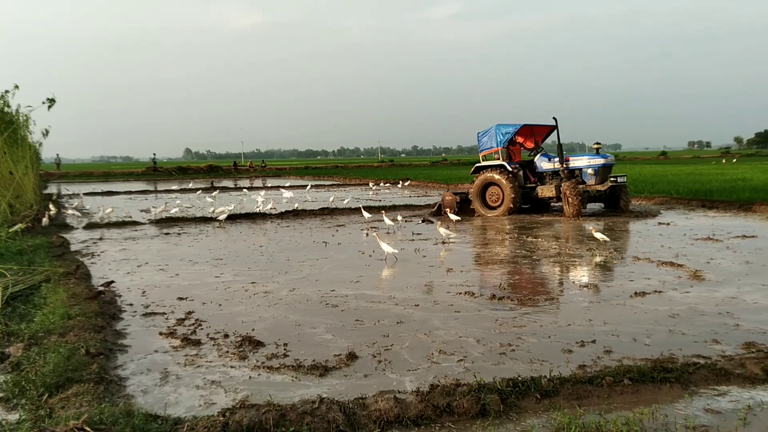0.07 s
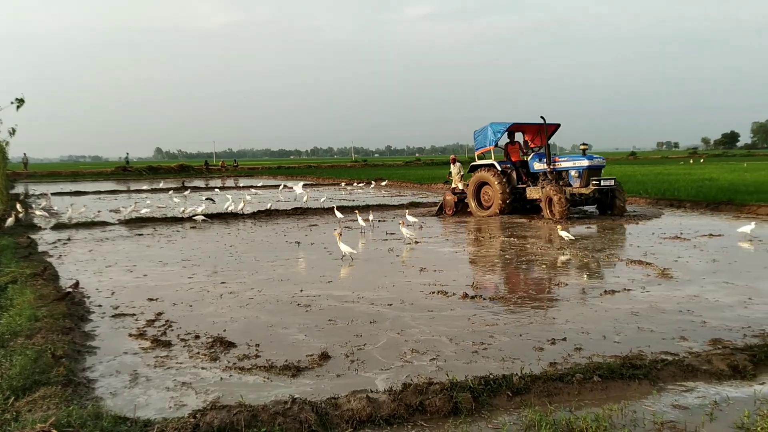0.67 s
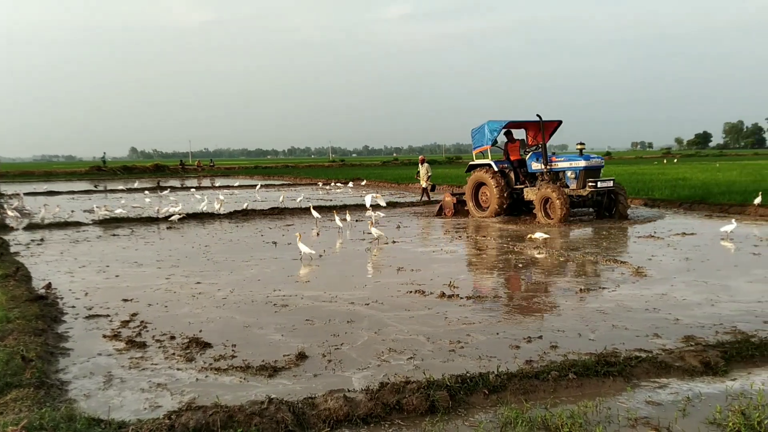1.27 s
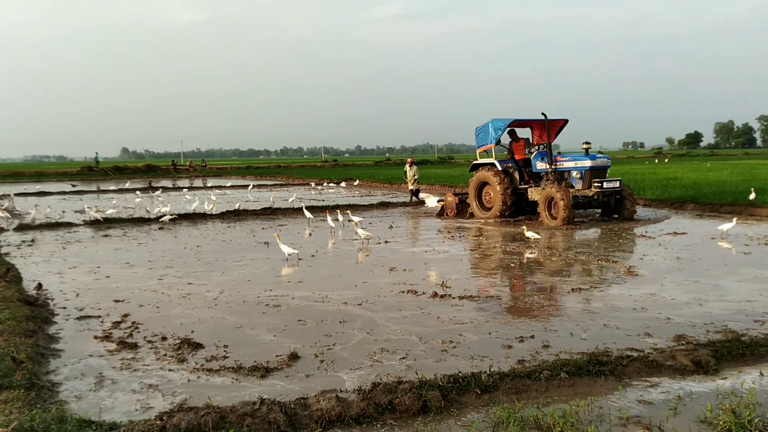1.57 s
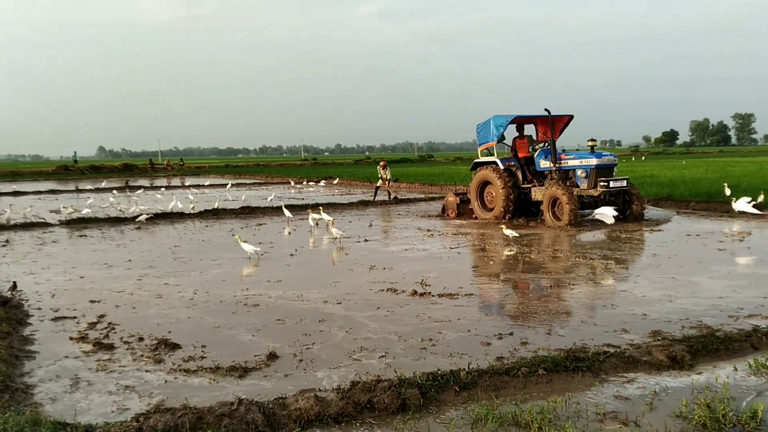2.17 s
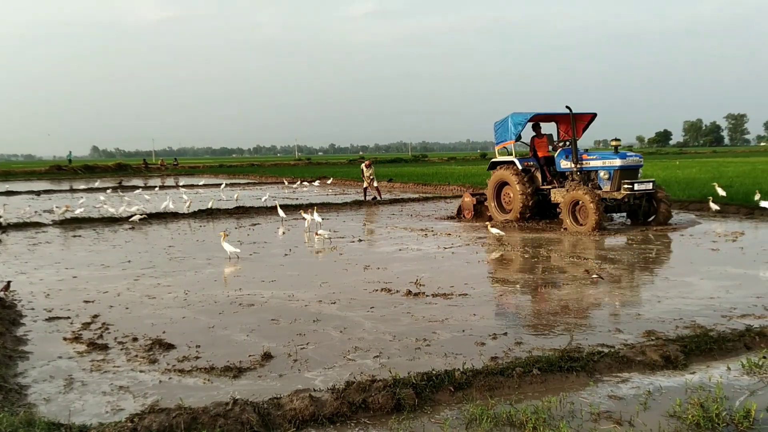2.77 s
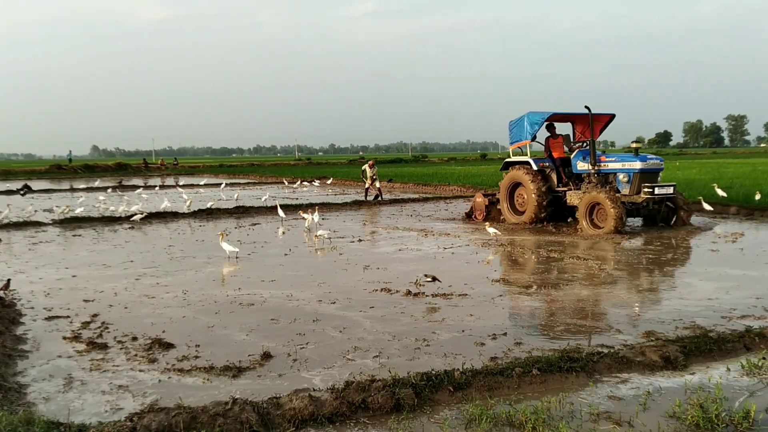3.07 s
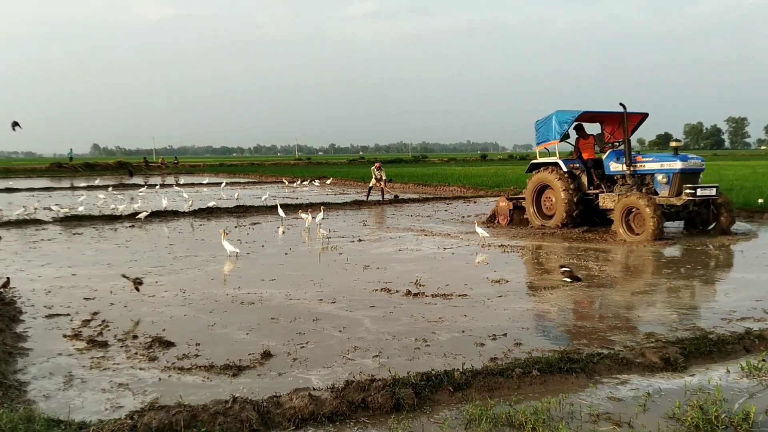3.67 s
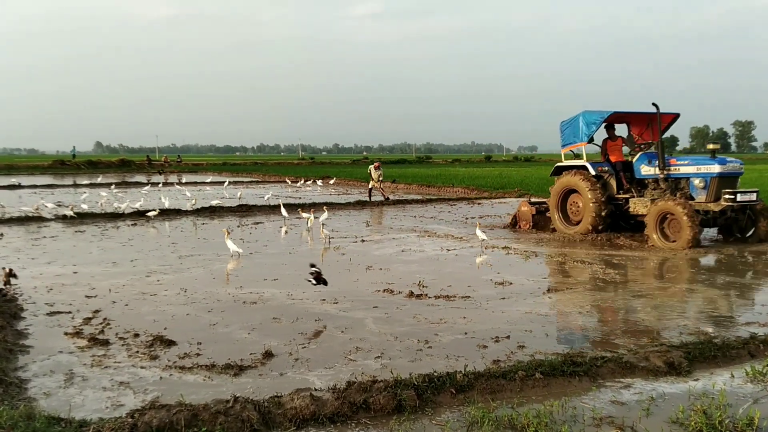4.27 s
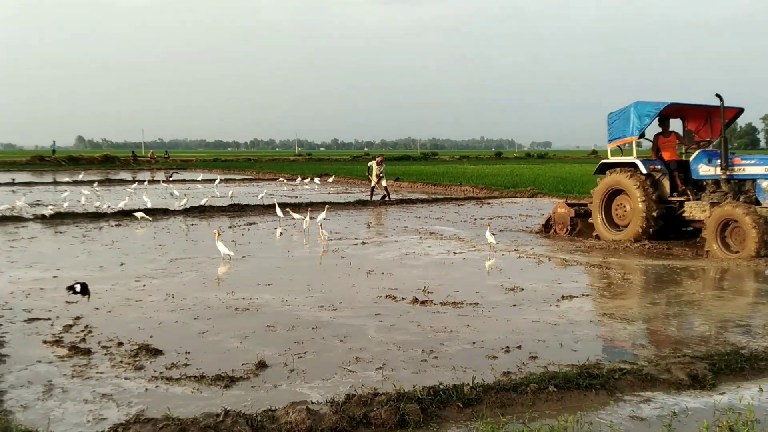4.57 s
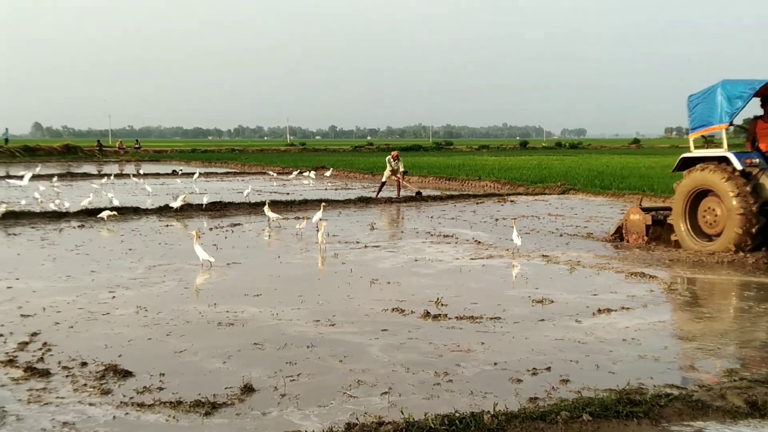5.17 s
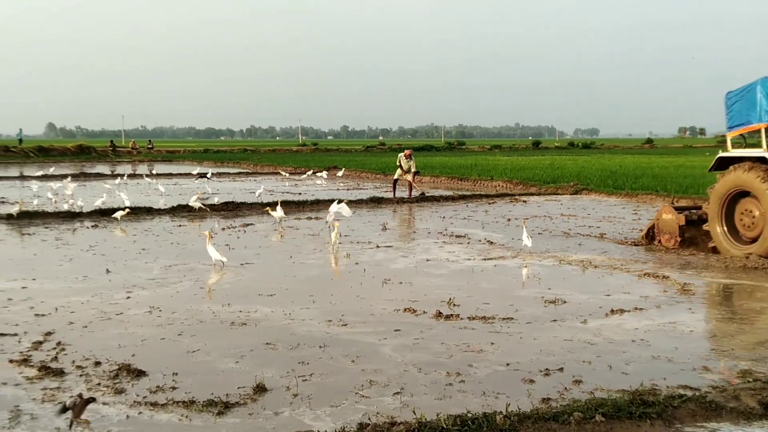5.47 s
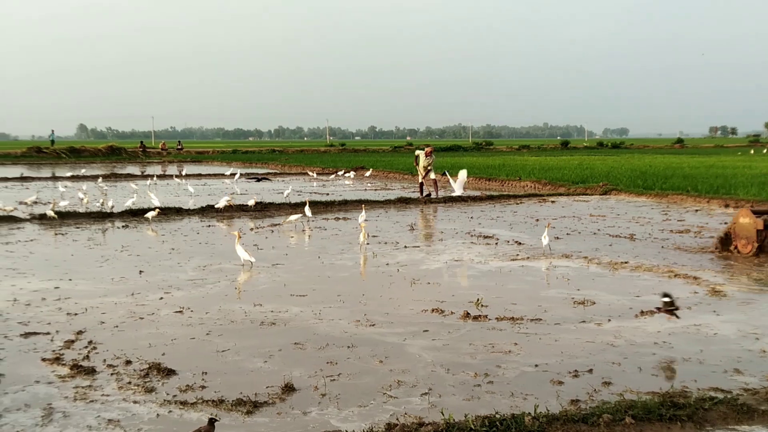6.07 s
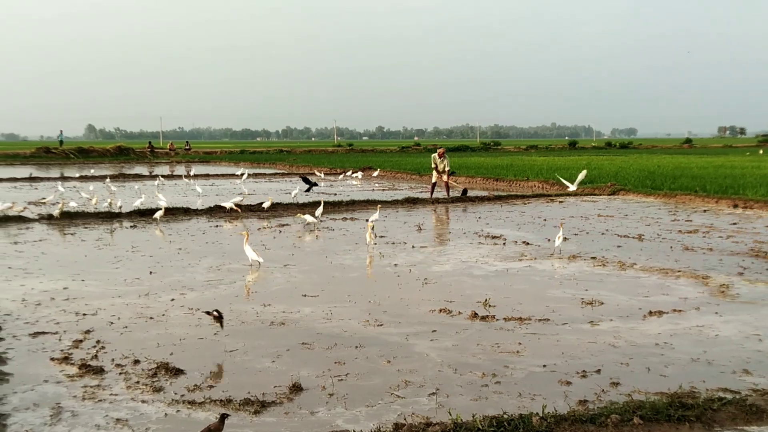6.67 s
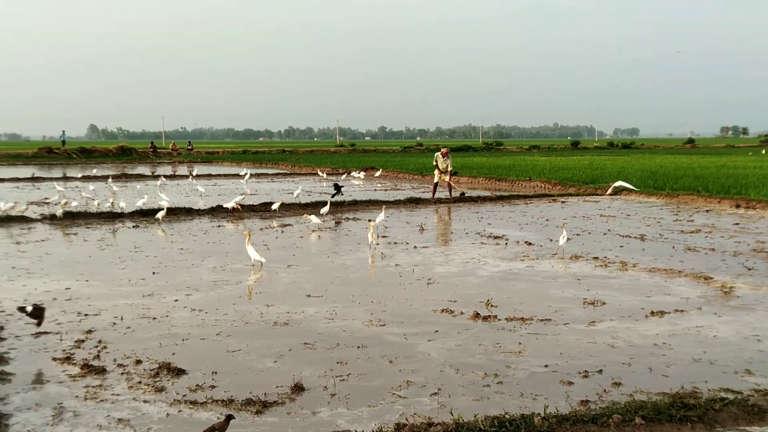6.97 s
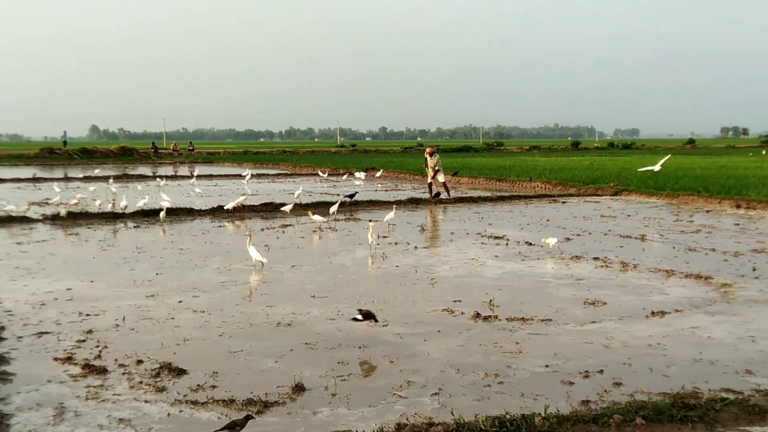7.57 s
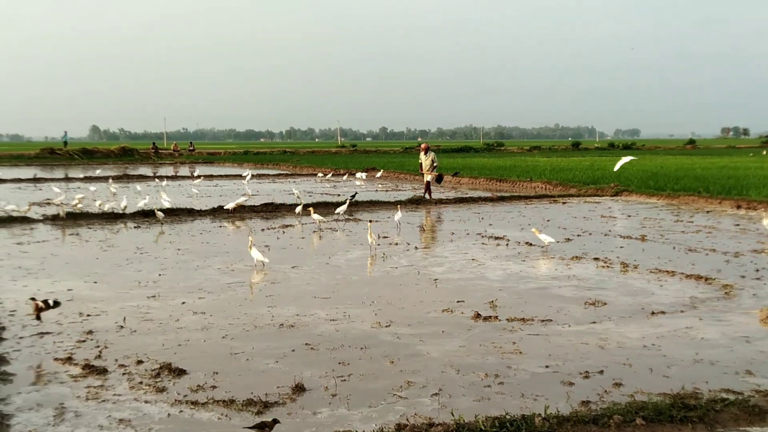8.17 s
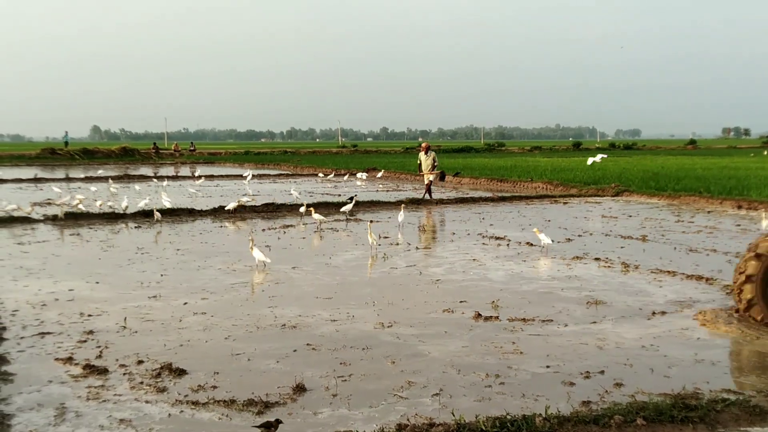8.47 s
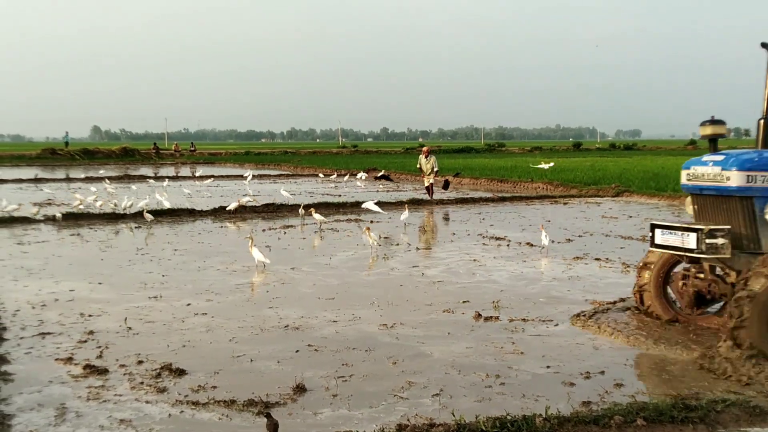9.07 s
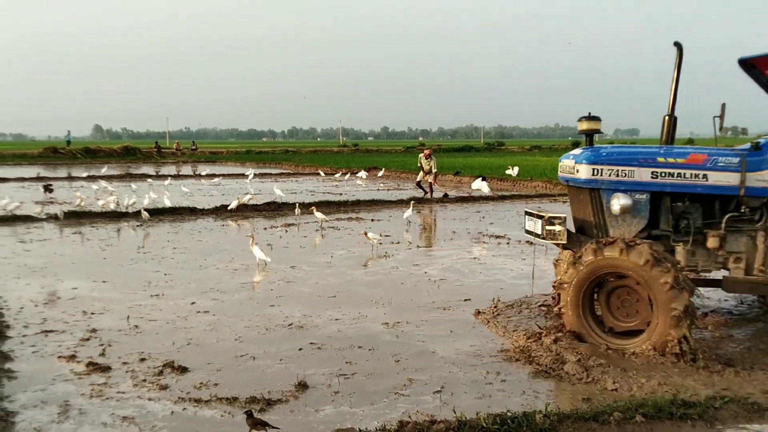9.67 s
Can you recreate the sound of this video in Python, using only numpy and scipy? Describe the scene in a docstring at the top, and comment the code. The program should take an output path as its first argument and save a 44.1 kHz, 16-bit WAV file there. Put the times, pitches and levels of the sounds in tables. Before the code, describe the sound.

A diesel tractor engine runs throughout, outdoors, with a low, steady exhaust drone, rapid knocking, rattling sheet metal and a fine high ticking. Underneath, a tiller churns muddy water in a soft, uneven wash. The engine pushes briefly at the start, settles slightly quieter by 1 second, then grows gradually louder from about 3 seconds as it approaches. Its speed stays nearly constant, with small swells and lulls as the load changes. Light metallic clanks occur irregularly, clustering between 5 and 5.5 seconds. From about 6 to 8 seconds the engine is fuller and its clatter crisper, with a harder pull near 7.7 seconds. A small bird gives short, high chirps at about 6, 6.3, 6.6 and 7.8 seconds. The tractor stays close and labours harder again just before the end, near 9.8 seconds.

```python
"""Diesel tractor tilling a flooded field

A three-cylinder diesel pulls a rotary tiller, coming nearer as it circles. Patches of heavy and
light mud vary the load: the engine slows, then the governor makes it work harder. Periodic firing
drives the exhaust drone, knocks the block and rattles the sheet metal, while the injectors tick.
Muddy water churns under the blades and a small bird calls a few times."""
import sys
import numpy as np
from scipy.fft import rfft, irfft, next_fast_len
from scipy.io import wavfile
from scipy.ndimage import map_coordinates

SR = 44100
rng = np.random.default_rng(int(sys.argv[2]) if len(sys.argv) > 2 else 0)


def pcm_store(signal):
    """Save signal as 16-bit PCM."""
    levels = np.round(np.clip(np.atleast_2d(signal), -1, 1) * 32767)
    wavfile.write(sys.argv[1], SR, levels.astype(np.int16).T)


N = 432621


# (time [s], drone level [dB], fourth-order level [dB], overtone level [dB]), at mean load
EXHAUST_LEVELS = [(0, -22, -36, -31), (1.2, -23, -39.5, -33.3), (3.2, -22.5, -39.5, -33.3),
                  (5.4, -20.5, -39, -29.5), (6.5, -19, -39.5, -31), (7.5, -19.5, -36.5, -35.5),
                  (8.2, -21, -32.5, -41.5), (8.9, -21.5, -32, -32), (9.81, -23.5, -36, -32.5)]
# exhaust orders: (frequency [multiple of the firing rate], relative level [dB])
DRONE_ORDERS = [(2, -2.5), (3, -1)]
OVERTONE_ORDERS = [(5, -2), (7, -15.5)]
FRACTIONAL_ORDERS = [(4 / 3, -26.5), (7 / 3, -30), (8 / 3, -23.5)]
# gas puff: (frequency [Hz], relative spectral density [dB])
PUFF_SPECTRUM = [(28, -46.5), (50, -8.5), (90, -0.5), (170, 2.5), (260, -1.5), (370, -2.5), (520, -10.5),
                 (700, -13.5), (1500, -27.5)]
def exhaust(turn, fuel, puff_db):
    """Periodic gas pulses radiate a harmonic drone and puffs of noise; a lull thins the drone."""
    drone_db, fourth_db, overtone_db = curves(EXHAUST_LEVELS)
    throb = orders(turn, [(1, -51.5)], flutter_db=1)
    throb *= amp(placement(near_share=0.1, flank_db=6) + effort(fuel, bite_db=6, lull_db=12))
    drone = orders(turn, DRONE_ORDERS, flutter_db=-0.13) + orders(turn, FRACTIONAL_ORDERS, flutter_db=5)
    drone *= amp(drone_db + effort(fuel, bite_db=-0.2, lull_db=11))
    fourth = orders(turn, [(4, 0)], flutter_db=1)
    fourth *= amp(fourth_db + effort(fuel, bite_db=-3, lull_db=-11))
    overtones = orders(turn, OVERTONE_ORDERS, flutter_db=0.16)
    overtones *= amp(overtone_db + effort(fuel, bite_db=-0.5, lull_db=0.5))
    gas = bursts(turn, TICK, delay=0.17, rise_s=0.0037, decay_s=0.034, scatter_db=1.5, floor=0.5)
    puffs = amp(puff_db + placement(near_share=0.87, flank_db=0)) * coloured(gas, PUFF_SPECTRUM)
    return throb + drone + fourth + overtones + puffs


def orders(turn, table, flutter_db):
    """Phase locking: partials of the three-firing cycle crest together as an exhaust valve opens."""
    return sum(np.sqrt(2) * amp(db + flutter_db * wobble(14))
               * np.cos(2 * np.pi * np.round(3 * order) / 3 * turn) for order, db in table)


# (place in the cycle [firings], knock level [dB], clatter level [dB], tick and puff level [dB])
CYLINDERS = [(0.721, -6, 1, -1.5), (1.749, -0.5, 1.5, 0.5), (2.65, -5, 3, -1.5)]
KNOCK, CLATTER, TICK = 1, 2, 3  # its level columns
def bursts(turn, column, delay, rise_s, decay_s, scatter_db, floor):
    """Impulsive excitation: noise flares at each firing and decays to a floor; delay is in firings."""
    t = np.arange(N) / SR
    power = np.zeros(N)
    for cylinder in CYLINDERS:
        firings = np.arange(-1, 130) * len(CYLINDERS) + cylinder[0] + delay
        jitter, size = rng.standard_normal((2, len(firings)))
        starts = np.interp(firings + 0.015 * jitter, turn, t, left=-1, right=t[-1] + 1)
        latest = np.maximum(np.searchsorted(starts, t, side="right") - 1, 0)
        age = np.abs(t - starts[latest])
        strength = amp(cylinder[column] + scatter_db * size)[latest]
        power += (strength * (1 - np.exp(-age / rise_s)) * np.exp(-age / decay_s)) ** 2
    envelope = (unit(np.sqrt(power)) + floor) / (1 + floor)
    return envelope * rng.standard_normal(N)


# structural modes: (frequency [Hz], bandwidth [Hz], relative level [dB])
BLOCK_MODES = [(681.4, 81, 1.5), (841, 116, -0.5), (980, 136, -3), (1355, 160, -7.5), (1522, 90, -4),
               (1670, 100, -9)]
BONNET_SIDE_MODES = [(467, 68, -6.5), (1054, 41, -4), (1106, 62, 0), (2063, 75, -16.5), (2447, 110, -14)]
BONNET_FRONT_MODES = [(368, 61, -7.5), (1005, 115, 2), (1072, 78, -10)]
# the bonnet's ring at mean load, which its panels beam to the side: (time [s], level [dB])
BONNET_LEVEL = [(0, -36), (0.4, -39), (1.6, -45.5), (3.5, -44.5), (4.8, -43), (5.9, -38.5), (6.5, -30.5),
                (7.5, -29), (8.2, -27), (8.9, -32.5), (9.81, -32.5)]
def knock(turn, fuel, block_db):
    """Forced vibration: combustion excites the modes of block and bonnet, harder with more fuel."""
    thuds = bursts(turn, KNOCK, delay=0.0096, rise_s=0.00075, decay_s=0.016, scatter_db=1, floor=1)
    blows = bursts(turn, KNOCK, delay=0, rise_s=0.0015, decay_s=0.014, scatter_db=4, floor=0.42)
    bonnet = crossfade(ringing(blows, BONNET_SIDE_MODES), ringing(blows, BONNET_FRONT_MODES), FACING)
    block_gain = amp(block_db + placement(near_share=0.2, flank_db=-2)
                     + effort(fuel, bite_db=3, lull_db=4.5))
    bonnet_gain = amp(curves(BONNET_LEVEL)[0] + effort(fuel, bite_db=3.5, lull_db=14))
    return block_gain * ringing(thuds, BLOCK_MODES) + bonnet_gain * unit(bonnet)


# the engine's open side: (time [s], share facing the listener [0-1])
OPEN_SIDE = [(0, 0.01), (2.6, 0), (3.8, 0.33), (5, 0.62), (6.2, 0.81), (8.5, 0.95), (9.8, 0.54)]
# clatter from two directions: (frequency [Hz], relative spectral density [dB])
FRONT_SPECTRUM = [(1200, -20), (1600, 1), (1850, -6), (2040, 2), (2300, 4.5), (2500, -11), (2750, -3),
                  (3000, -10), (3550, 2.5), (4000, 0), (4500, -2), (5900, -6), (6400, -10), (8000, -10)]
SIDE_SPECTRUM = [(1200, -24.5), (1650, -10), (1900, -8), (2060, -4), (2220, -7), (2420, -1), (2800, 4),
                 (3300, -1), (3800, 1), (4600, -1), (5300, -7.5), (6200, -28), (8000, -6.5)]
def clatter(turn, fuel, clatter_db):
    """Directional radiation: diesel clatter is blurred from the front, crisp from the open side."""
    blur = 0.2 + 0.6 * share(FACING)
    front = bursts(turn, CLATTER, delay=0.02, rise_s=0.0008, decay_s=0.021, scatter_db=2, floor=1)
    side = bursts(turn, CLATTER, delay=0.04, rise_s=0.0008, decay_s=0.009, scatter_db=0.6, floor=blur)
    rattle = crossfade(coloured(front, FRONT_SPECTRUM), coloured(side, SIDE_SPECTRUM), OPEN_SIDE)
    return rattle * amp(clatter_db + placement(near_share=0.28, flank_db=6.5)
                        + effort(fuel, bite_db=4.5, lull_db=7.5))


# injector tick: (time [s], level [dB])
TICK_LEVEL = [(0, -41), (2.2, -46.5), (3.2, -41), (5.3, -47.5), (6.5, -36), (7.6, -40.5), (8.3, -72),
              (9.1, -54), (9.81, -36)]
# (frequency [Hz], relative spectral density [dB])
TICK_SPECTRUM = [(4000, -28), (6300, -18), (6900, -9.5), (7350, 2.5), (7650, -2.5), (8000, -7)]
def injectors(turn):
    """Brief impacts radiate high frequencies: an injector ticks once per firing."""
    ticks = bursts(turn, TICK, delay=0.19, rise_s=0.00077, decay_s=0.0049, scatter_db=3.5, floor=0.12)
    return amp(curves(TICK_LEVEL)[0]) * coloured(ticks, TICK_SPECTRUM)


# blows that stand out: (time [s], relative level [dB])
HARD_KNOCKS = [(0.135, -24), (0.482, -23), (3.772, -22), (3.796, -22), (4.434, -27), (4.911, -22),
               (5.019, -18.5), (5.151, -23), (5.176, -24), (5.312, -24), (5.336, -19.5), (5.421, -16),
               (5.5, -26), (5.635, -27), (6.215, -22.5), (7.021, -27), (7.559, -18.5), (7.644, -23),
               (7.778, -21.5), (8.126, -27.5), (9.401, -20.5)]
# (frequency [Hz], bandwidth [Hz], relative level [dB])
LOOSE_METAL_MODES = [(2250, 180, 6.5), (2860, 160, 0.5), (4280, 230, -5.5), (5350, 750, -1.5),
                     (6360, 430, -0.5)]
def hard_knocks():
    """Damped vibration: loose metal takes an occasional harder blow, a clank with a bright edge."""
    t = np.arange(N) / SR
    envelope = np.zeros(N)
    for s, db in HARD_KNOCKS:
        age = np.maximum(t - s + 0.00091, 0)
        envelope += amp(db - 3.5) * (1 - np.exp(-age / 0.00016)) * np.exp(-age / 0.0082)
    clank = ringing(rng.standard_normal(N), BLOCK_MODES)
    edge = ringing(rng.standard_normal(N), LOOSE_METAL_MODES)
    return envelope * (clank + amp(-7.5) * edge)


# churned water: (frequency [Hz], relative spectral density [dB])
WATER_SPECTRUM = [(40, -53), (130, -10), (350, -11.5), (1100, -7), (2600, -15), (4500, -20.5),
                  (8000, -21.5)]
def tiller():
    """Turbulence: the blades churn muddy water into an uneven wash, louder as they near and bite."""
    splashes = rng.standard_normal(N) * amp(0.67 * wobble(9) + 2.9 * wobble(300))
    level_db = -37.5 + placement(near_share=0.2, flank_db=-2) + effort(load(), bite_db=1.5, lull_db=-1.5)
    return amp(level_db) * coloured(splashes, WATER_SPECTRUM)


# (time [s], duration [s], start pitch [Hz], middle pitch [Hz], end pitch [Hz], level [dB])
WHISTLES = [(5.971, .04, 3200, 3680, 3380, -30.5), (6.247, .032, 5300, 5900, 5960, -37),
            (6.275, .028, 3980, 3430, 3170, -28), (6.576, .038, 5200, 5770, 5550, -31),
            (6.605, .028, 3950, 3480, 3200, -29), (7.842, .043, 3410, 3570, 3100, -30.5)]
def bird():
    """Frequency modulation: each whistle bends in one arc as it swells and fades, with a weak octave."""
    song = np.zeros(N)
    for s, length, start_hz, middle_hz, end_hz, db in WHISTLES:
        progress = np.linspace(0, 1, round(length * SR))
        hz = np.polyval(np.polyfit([0, 0.5, 1], [start_hz, middle_hz, end_hz], 2), progress)
        phase = 2 * np.pi * np.cumsum(hz) / SR
        tone = np.sin(phase) + amp(-15.5) * np.sin(2 * phase)
        swell = np.sqrt(2) * np.sin(np.pi * progress)
        song[round(s * SR):][:len(tone)] += amp(db) * swell * tone
    return song


# heavy (+) or light (-) mud: (time the fuel answers [s], half-width [s], load [firings/s of slowing])
MUD_PATCHES = [(0.299, 0.174, 0.574), (0.688, 0.107, -0.204), (1.272, 0.189, -0.166),
               (2.387, 0.142, -0.288), (2.705, 0.114, 0.283), (3.049, 0.122, -0.221),
               (3.484, 0.136, -0.323), (3.775, 0.092, 0.405), (4.494, 0.09, 0.141), (4.756, 0.105, -0.402),
               (5.433, 0.137, 0.502), (5.967, 0.161, -0.428), (6.353, 0.09, 0.263), (6.627, 0.096, 0.275),
               (6.916, 0.114, -0.149), (7.657, 0.178, 0.845), (9.868, 0.131, 1.32)]
def load(ahead_s=0):
    """Drag on the tiller varies about its mean: a Gaussian swell or lull for each patch of mud."""
    t = np.arange(N) / SR + ahead_s
    return sum(size * np.exp(-((t - s) / half_width) ** 2) for s, half_width, size in MUD_PATCHES)


def effort(fuel, bite_db, lull_db):
    """Level follows load: dB gained per unit of extra load and lost per unit of lighter load."""
    return bite_db * np.maximum(fuel, 0) + lull_db * np.minimum(fuel, 0)


# the tractor's approach: (time [s], gain [dB])
NEARNESS = [(0, 2), (1.2, 0), (3.2, 1.1), (5, 4), (6.5, 6.5), (7.7, 6), (8.8, 6.5), (9.81, 10)]
# the bonnet's front: (time [s], share facing the listener [0-1])
FACING = [(0, 0.82), (4.5, 1), (6.2, 0.29), (7.8, 0.3), (8.8, 0.9), (9.8, .95)]
def placement(near_share, flank_db):
    """Spreading and directivity: dB a part gains as the tractor nears and shows its flank."""
    return near_share * curves(NEARNESS)[0] + flank_db * (1 - share(FACING))


def amp(db):
    """Amplitude ratio of a level in decibels."""
    return 10 ** (np.asarray(db) / 20)


def unit(x):
    """Normalisation to rms 1."""
    return x / np.sqrt(np.mean(x ** 2) + 1e-20)


def curves(rows):
    """Linear interpolation: one value per sample for each column after the time."""
    s, *columns = np.transpose(rows)
    return [np.interp(np.arange(N) / SR, s, column) for column in columns]


def share(rows):
    """A proportion over time, bounded by 0 and 1."""
    return np.clip(curves(rows)[0], 0, 1)


def crossfade(a, b, rows):
    """Power addition: a gives way to b as the tabled share goes from 0 to 1."""
    weight = share(rows)
    return np.sqrt(1 - weight) * a + np.sqrt(weight) * b


def wobble(rate):
    """Random modulation: a smooth curve through rate knots a second."""
    return map_coordinates(rng.standard_normal(int(N * rate / SR) + 4), [np.arange(N) * rate / SR])


def filtered(x, response):
    """Linear filtering: the spectrum of x times a frequency response."""
    size = next_fast_len(N + SR // 2)
    return irfft(rfft(x, size) * response(np.fft.rfftfreq(size, 1 / SR)), size)[:N]


def coloured(x, spectrum):
    """Spectral shaping by (frequency [Hz], level [dB]) points on a log axis, at rms 1."""
    points_hz, db = np.transpose(spectrum)
    return unit(filtered(x, lambda hz: amp(np.interp(np.log(hz + 1), np.log(points_hz), db))))


def ringing(x, modes):
    """Modal superposition: x drives damped resonators of alternating sign, at rms 1."""
    def response(hz):
        return sum((-1) ** k * amp(db) * 1j * hz * width / (centre ** 2 - hz ** 2 + 1j * hz * width)
                   for k, (centre, width, db) in enumerate(modes))
    return unit(filtered(x, response))


# a short reflection, strongest while the tractor is far: (time [s], amplitude [ratio to direct sound])
REFLECTION = [(0, 0.28), (3.2, 0.31), (4.2, 0.082), (6, 0.037), (9.8, 0.07)]
def reflection(direct, delay_s):
    """Comb filtering: an echo just behind the direct sound cuts evenly spaced, hollow notches."""
    strength = curves(REFLECTION)[0]
    echo = filtered(direct, lambda hz: np.exp(-2j * np.pi * hz * delay_s))
    return (direct - strength * echo) / np.sqrt(1 + strength ** 2)


# the governor's target: (time [s], firing rate [Hz])
SET_SPEED = [(0, 37.672), (2, 37.698), (5, 37.569), (7.5, 37.401), (9, 37.644), (9.81, 37.624)]
GOVERNOR_LAG_S = 0.109
def scene():
    """Speed governing: one crankshaft times the firings; load slows it at once and fuel follows."""
    firing_hz = curves(SET_SPEED)[0] - load(ahead_s=GOVERNOR_LAG_S)
    turn = np.cumsum(firing_hz) / SR - 0.242  # crank position [firings]
    fuel = load()
    low_parts = knock(turn, fuel, block_db=-34.5) + hard_knocks() + tiller()
    return (exhaust(turn, fuel, puff_db=-34) + reflection(low_parts, delay_s=0.00168)
            + clatter(turn, fuel, clatter_db=-38.5) + injectors(turn) + bird())


TOP_HZ, TAPER_HZ = 8150, 500
def record(dry):
    """Band limiting: the treble tapers to nothing at the top frequency."""
    return filtered(dry, lambda hz: np.clip((TOP_HZ - hz) / TAPER_HZ, 0, 1))


dry = scene()
out = record(dry)
pcm_store(out)
```